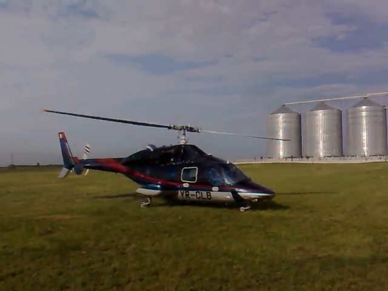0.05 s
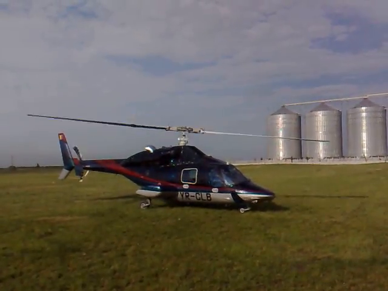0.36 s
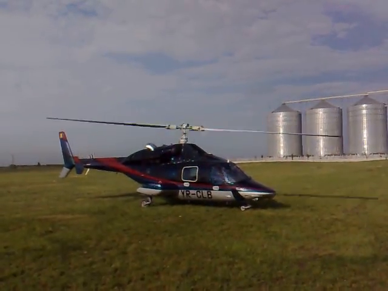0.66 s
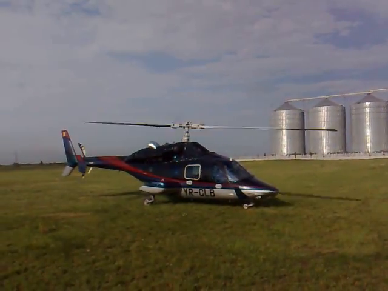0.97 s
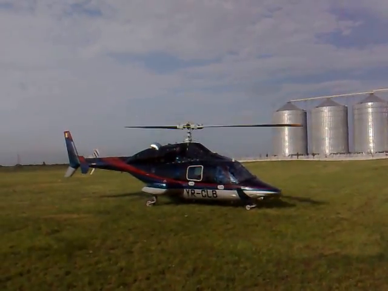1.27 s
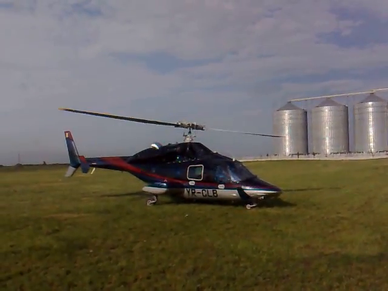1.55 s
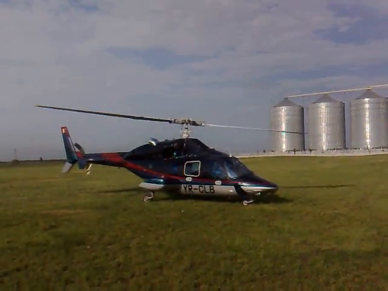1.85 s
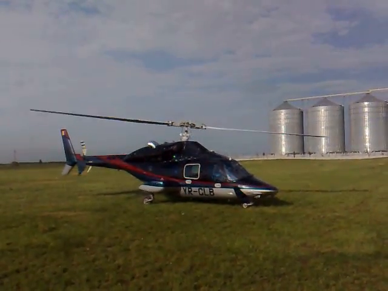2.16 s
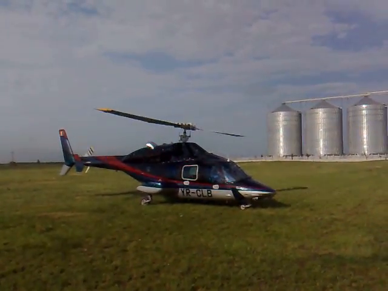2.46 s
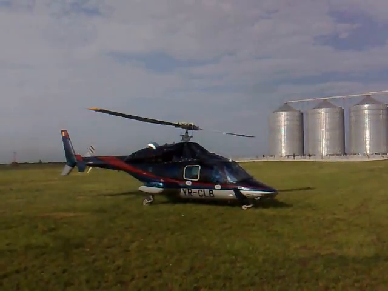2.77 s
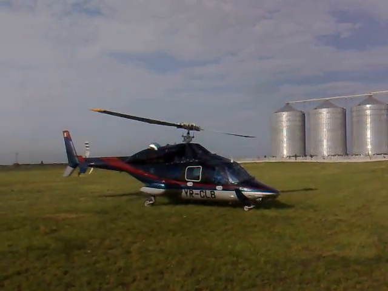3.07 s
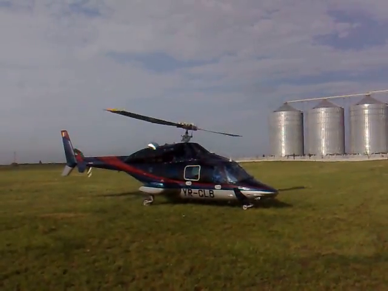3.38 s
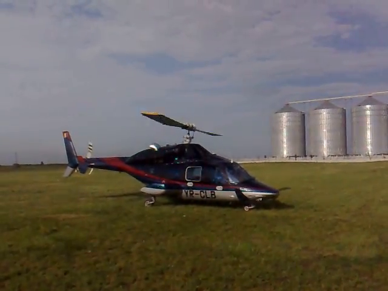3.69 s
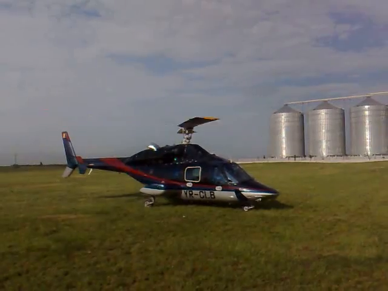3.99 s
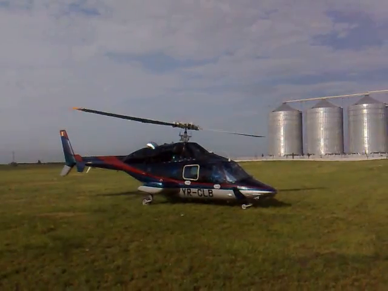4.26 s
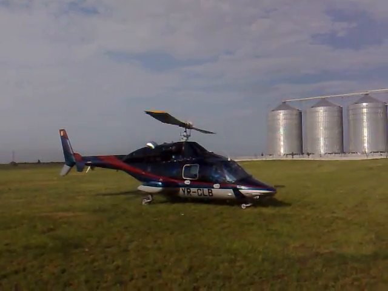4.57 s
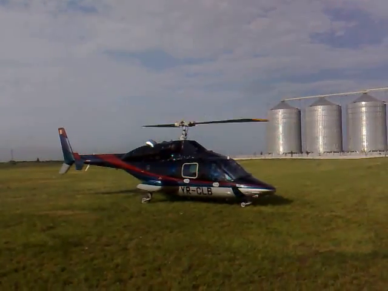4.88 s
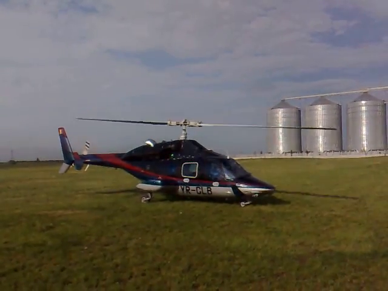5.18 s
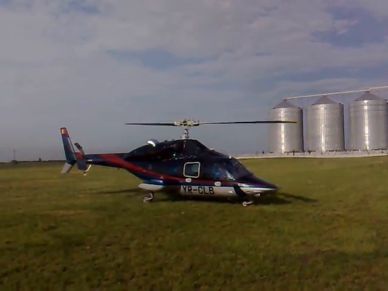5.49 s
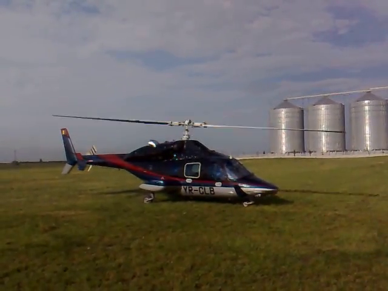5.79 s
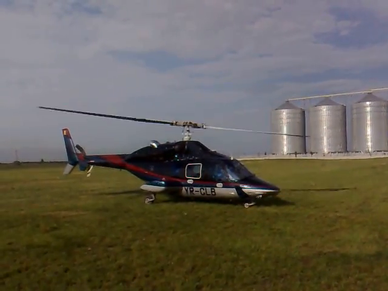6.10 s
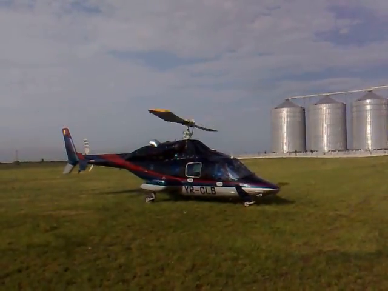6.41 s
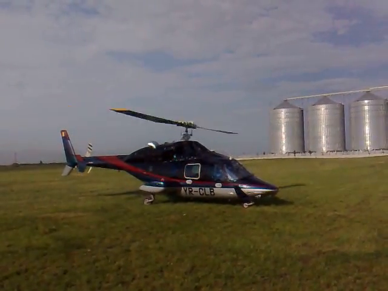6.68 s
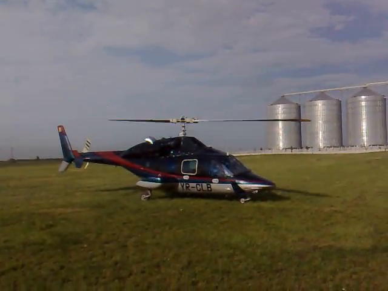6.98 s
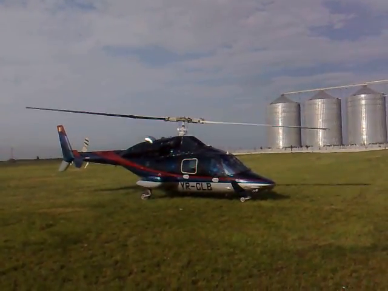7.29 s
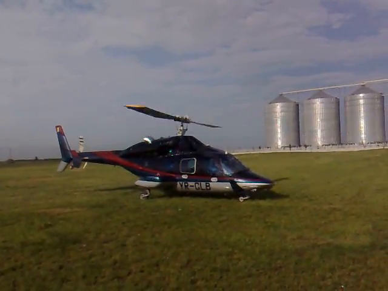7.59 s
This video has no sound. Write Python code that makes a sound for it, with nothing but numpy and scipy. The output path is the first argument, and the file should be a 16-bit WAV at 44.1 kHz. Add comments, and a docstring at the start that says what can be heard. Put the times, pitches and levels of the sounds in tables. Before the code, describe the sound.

A helicopter spools up on an open field, heard loud and continuous from about twenty metres away, straight ahead. For the first 2 seconds the turbine idles with a piercing, very high whine over intake hiss and exhaust rumble, while the blades swish about nine times a second. From 2 seconds the whine climbs, and a breathy whistle swells to a peak around 3.4 seconds before receding. The main rotor slowly quickens to about eleven beats a second, its thump and crackle growing stronger. A low tail rotor hum comes forward around 4 seconds, and faint, thin gear tones sit far behind. Irregular blade slaps poke through, one clearly near 4.9 seconds. Throughout, the whine and hiss flutter in the moving air. After about 7.3 seconds the whine sags slightly, and a blade slaps hard near 7.6 seconds, with the engine still running.

```python
"""A two-bladed turbine helicopter spools up on an open grass field, some twenty metres away.
It opens at idle: the compressor whines near 11 kHz over intake hiss and exhaust rumble, and the blades
swish. From about 2 s the whine climbs, and a breathy duct whistle swells to its peak at 3.4 s.
The main rotor gathers speed and its thump builds, driving the tail rotor's hum and the gearbox with it.
Near the end the whine sags and a blade slaps hard. All along, stirred air flutters and fades the treble."""
import sys
import numpy as np
from scipy import signal
from scipy.fft import rfft, irfft, next_fast_len
from scipy.io import wavfile
from scipy.ndimage import uniform_filter1d, minimum_filter1d

SR = 44100
rng = np.random.default_rng(int(sys.argv[2]) if len(sys.argv) > 2 else 0)


def generate_wav(signal):
    """Clip the signal to [-1, 1] and save it as 16-bit WAV at the path in sys.argv[1]."""
    frames = np.transpose(np.atleast_2d(signal))
    scaled = np.clip(frames, -1, 1) * 32767
    pcm = np.round(scaled).astype(np.int16)
    wavfile.write(sys.argv[1], SR, pcm)


N = 346185
T = np.arange(N) / SR


# the pulse of the scene, main blades passing per second: t/s, f/Hz
BLADE_RATE = [(0, 9.332), (1, 9.414), (2, 9.534), (3, 9.79), (4, 10.104), (5, 10.4), (6, 10.644),
              (7, 10.89), (7.85, 11.09)]
def rotor_drive():
    """The rotor winds up: the running count of blade passes, and its speed from 0 to 1."""
    hz, = curves(BLADE_RATE)
    return turns(hz), zero_to_one(hz)


# colour of the blade-tip crack: f/Hz, relative level/dB
CRACK_EQ = [(200, -26), (480, -16), (650, -7), (900, 9), (1250, -13), (1600, 6), (2000, -11.5), (2600, -6),
            (3500, -8), (6000, -38)]
def blade_thump(blade, speed):
    """Each blade pushes out a pressure dip and crest, and its tip vortex cracks; both build with speed."""
    level_db = -55 + 27.5 * speed ** .48  # most of the swell comes early
    crack_db = .6 * level_db - 7 + 2 * walk(11)
    crack_envelope = bell(offset(blade, .04), .06) * undb(crack_db)
    phase = offset(blade, .09)
    pulse = unit(np.sin(2 * np.pi * 3.7 * phase) * bell(phase, .072))
    thump = pulse * undb(level_db + 1.5 * walk(11))  # no two hits alike
    return thump + turbulence(CRACK_EQ) * crack_envelope


# colour of the air torn by a blade: f/Hz, relative level/dB
SWISH_EQ = [(150, 1.5), (300, -9.5), (410, 1), (480, 4), (570, 2.5), (660, -29), (850, -6.5), (1100, -5),
            (1600, -13), (2100, -21.5), (5000, -32)]
# accents where a blade hits its own wake: t/s, level/dB
WAKE_SLAPS = [(.112, -20), (1.715, -25), (1.92, -27), (2.235, -20), (3.06, -23), (3.16, -22), (3.56, -22),
              (3.66, -27), (4.06, -24), (4.25, -28), (4.85, -17), (5.8, -31), (6.17, -28), (6.27, -26),
              (6.73, -37), (7.645, -14)]
# fader rides for the load on both rotors: t/s, swish level/dB, tail rotor level/dB
ROTOR_LOAD = [(0, -32.5, -35.5), (.8, -35.5, -39), (2, -31.5, -35.5), (3.5, -29, -35.5), (4.0, -30, -28),
              (4.6, -26.5, -33), (5.3, -31, -34.5), (6.3, -26.5, -30), (6.9, -30.5, -30.5), (7.6, -28, -33),
              (7.85, -31, -29)]
def blade_swish(blade):
    """Air noise swells as each tip swings towards the listener, and spikes when a blade slaps its wake."""
    swish_db, _ = curves(ROTOR_LOAD)
    swell = bell(offset(blade, .095), width=.14) * undb(1.5 * walk(14))
    sweep = unit(.25 + swell) * undb(swish_db)  # a bed of air stays between blades
    slaps = sum(undb(db) * bell(T - at, width=.0044) for at, db in WAKE_SLAPS)
    return turbulence(SWISH_EQ) * np.hypot(sweep, slaps)


# harmonic stack of the tail hum: multiple of the tail blade rate, relative level/dB
TAIL_HARMONICS = [(1, -3.5), (2, 1.5), (3, 0.5), (4, -7), (5, -16), (6, -18)]
def tail_rotor(blade):
    """A low hum, geared to the main rotor, whose harmonics waver in the rotor wash."""
    _, tail_db = curves(ROTOR_LOAD)
    cycles = 5.394 * blade + .022 * walk(10)
    hum = sum(undb(db) * tone(k * cycles, fade_db=2, fade_hz=10) for k, db in TAIL_HARMONICS)
    return hum * undb(tail_db)


# pitch glide of the compressor's blade tone: t/s, f/Hz
WHINE_PITCH = [(0.0, 10555), (0.3, 10569), (1.0, 10594), (1.55, 10610), (1.85, 10647), (2.15, 10733),
               (2.45, 10861), (3.05, 11178), (3.35, 11290), (3.65, 11364), (4.0, 11433), (4.6, 11505),
               (5.4, 11576), (6.2, 11622), (6.9, 11649), (7.25, 11677), (7.5, 11629), (7.85, 11489)]
COMPRESSOR_BLADES = 18
def turbine_drive():
    """The turbine spools up: the running cycles of its blade tone, and its speed from 0 (idle) to 1."""
    hz, = curves(WHINE_PITCH)
    return turns(hz), zero_to_one(hz)


# fader ride for the whine as the air carries it: t/s, relative level/dB
WHINE_RIDE = [(0.0, -21), (0.23, -8), (0.65, -17), (0.73, -9), (1.43, -13.5), (1.5, -16.5), (1.68, -12),
              (2.08, -16.5), (2.27, -13.5), (2.75, -18.5), (2.85, -12.5), (2.95, -22), (3.68, -16.5),
              (4.1, -21), (4.28, -7.5), (4.4, -18.5), (5.65, -12.5), (5.93, -20.5), (6.88, -13.5),
              (6.98, -20.0), (7.43, -12.5), (7.62, -26.5), (7.7, -15), (7.85, -26)]
# faint partials under the whine: multiple of the shaft rate, level at idle/dB
SHAFT_PARTIALS = [(6, -46), (9, -45), (12, -46), (17, -38), (19, -41)]
def compressor(spool, speed, flutter):
    """The blades sing one piercing tone; eddies scatter a halo round it, over faint shaft partials."""
    ride_db, = curves(WHINE_RIDE)
    cycles = spool + (.04 + .05 * speed) * walk(45)  # stronger downwash bends the tone's path more
    shimmer = unit(1 + .3 * np.tanh(walk(110)))
    whine = unit(np.sin(2 * np.pi * cycles)) * shimmer
    halo = undb(-12.5 + 5 * speed) * smeared(cycles + 70 * T, width_hz=340)
    shaft = cycles / COMPRESSOR_BLADES
    partials = sum(undb(db) * smeared(k * shaft, width_hz=8 + 2.6 * k) for k, db in SHAFT_PARTIALS)
    # the whine ducks with the treble flutter and flickers on its own, less in the calm air at idle
    stirred = 1 - .28 * (1 - speed)
    duck_db = stirred * (1.5 * dips(flutter) + 6 * dips(walk(34)))
    return (whine + halo) * undb(ride_db + 3.5 + duck_db) + partials * undb(3.2 * speed)


# colours of the duct rush, the intake hiss and the fine sizzle on top: f/Hz, relative level/dB
RUSH_EQ = [(1900, -52), (2200, -27), (2400, -7.5), (2800, -44), (3170, -0.5), (3350, -6), (3820, 6.5),
           (4100, 2), (4350, 3), (4700, -0.5), (5150, 4), (5400, -33), (6200, -32), (8000, -48)]
HISS_EQ = [(3000, -8), (4500, -38), (5200, -19), (5380, -4), (5580, -5), (5800, 0), (6250, 3.5),
           (6500, 3.5), (7200, 4), (7650, 1), (8100, 2), (8500, -4.5), (9200, -7), (12000, -38)]
SIZZLE_EQ = [(8500, -22), (9300, -10), (9900, -1), (10400, 3), (11000, 3), (11800, 0), (12500, -4),
             (13100, -2), (13700, 0), (14300, -1), (15000, -3.5), (15700, -8)]
# fader ride for the duct rush: t/s, relative level/dB
RUSH_RIDE = [(0.0, -21.5), (0.43, -25), (0.62, -20), (0.88, -23.5), (1.45, -22), (1.53, -26), (2.0, -25),
             (2.45, -19.5), (3.0, -26), (3.33, -23), (4.28, -28), (4.9, -23.5), (5.88, -29.5), (6.75, -25),
             (6.83, -30.5), (7.08, -24), (7.48, -33), (7.85, -24)]
# the treble as the air carries it: t/s, relative hiss level/dB, relative sizzle level/dB
TREBLE_RIDE = [(0.0, -21, -26), (0.4, -22.5, -22), (0.5, -21, -26.5), (1.23, -24.0, -28.0),
               (1.33, -21.5, -25.0), (1.48, -27.5, -27.5), (2.08, -21, -25), (2.33, -20, -22),
               (2.43, -17.5, -26), (2.75, -21.0, -23), (3.12, -24.0, -29), (3.33, -20.0, -22),
               (4.0, -24.5, -26.0), (4.8, -21.0, -24.5), (4.93, -16.5, -19.5), (5.08, -22, -24),
               (5.6, -20.5, -24.0), (5.95, -26.5, -27), (6.83, -19.5, -22), (6.98, -23, -25.5),
               (7.23, -20.5, -21.5), (7.58, -28.0, -29.0), (7.7, -19.5, -26), (7.85, -26, -26.0)]
FLUTTER_HZ = 26
def intake(blade, flutter):
    """Air rushes through the ducts and hisses on the compressor; eddies flutter the top band most."""
    rush_db, = curves(RUSH_RIDE)
    hiss_db, sizzle_db = curves(TREBLE_RIDE)
    rush = turbulence(RUSH_EQ) * undb(rush_db + 1 + .82 * walk(FLUTTER_HZ))
    hiss = turbulence(HISS_EQ) * undb(hiss_db + .17 + walk(FLUTTER_HZ))
    chop_db = 1.5 * np.cos(2 * np.pi * blade)  # each passing blade chops the sizzle
    sizzle = turbulence(SIZZLE_EQ) * undb(sizzle_db + 5 - 1.5 * flutter + chop_db)
    return rush + hiss + sizzle


# colours of the exhaust's low end and its midrange body: f/Hz, relative level/dB
RUMBLE_EQ = [(15, -26), (40, -19), (75, -8), (100, -2.5), (150, 3), (190, -1.5), (250, -13), (330, -25.5),
             (600, -22)]
ROAR_EQ = [(200, -3), (330, -3), (480, 1), (660, -1.5), (850, 2), (1050, -2), (1350, 1), (1550, -5.5),
           (1780, -4), (1950, -14), (2200, -14.5), (2600, -13.5), (3500, -6), (6000, -63)]
# fader rides for engine power: t/s, relative rumble level/dB, relative roar level/dB
EXHAUST_RIDE = [(0.0, -23.5, -26.5), (0.4, -29.5, -29), (0.65, -26, -28), (0.9, -35, -32), (1.1, -28, -30),
                (2.15, -25.5, -26.5), (2.9, -23, -27.5), (3.25, -19, -25.5), (4.15, -25, -25.0),
                (4.35, -28, -26), (4.53, -22.5, -23.5), (5.1, -27.0, -26.5), (6.55, -23.5, -24.0),
                (7.85, -23.5, -24)]
def exhaust(blade):
    """Combustion rumbles and the jet roars; both throb as blades cut through the exhaust."""
    rumble_db, roar_db = curves(EXHAUST_RIDE)
    throb = np.cos(2 * np.pi * offset(blade, .9))
    rumble = turbulence(RUMBLE_EQ) * undb(rumble_db - 3 + throb)
    roar = turbulence(ROAR_EQ) * undb(roar_db + 1 + .57 * throb + .49 * walk(25))
    return rumble + roar


# fader ride for the rising whistle: t/s, level/dB
WHISTLE_RIDE = [(0, -42), (2.6, -34), (3.1, -28.5), (3.4, -23.3), (3.9, -26), (4.3, -32.5), (4.95, -30),
                (5.6, -35), (6.0, -35), (6.35, -34), (6.8, -35), (7.5, -43), (7.85, -35)]
def duct_whistles(spool):
    """A breathy whistle rises with the shaft; two fixed duct resonances sing at idle, then fall back."""
    rising_db, = curves(WHISTLE_RIDE)
    rising = smeared(.4394 * spool, width_hz=125) + undb(-11) * smeared(.378 * spool, width_hz=70)
    rising = unit(rising * undb(2.2 * walk(30)))
    idle = smeared(6180 * T, width_hz=90) + undb(-9) * smeared(5170 * T, width_hz=90)
    idle_db = np.interp(T, [0, 2.5, 3.2], [-31, -31, -50])
    return rising * undb(rising_db) + idle * undb(idle_db)


# fader rides for the gears: t/s, main transmission level/dB, turbine gear level/dB
GEAR_RIDE = [(0, -54, -50), (2, -50, -44), (4.2, -47, -41), (4.7, -37.5, -39), (5.4, -40.5, -40),
             (6.3, -46, -35), (7.2, -50, -34), (7.85, -48, -37)]
def gearbox(blade, spool):
    """Two thin mesh tones far back in the mix: one tracks the rotor, one twice the turbine shaft rate."""
    main_db, turbine_db = curves(GEAR_RIDE)
    shaft = spool / COMPRESSOR_BLADES
    main = tone(160.86 * blade + .15 * walk(25), fade_db=2.5, fade_hz=30)
    turbine = tone(2 * shaft + .1 * walk(30), fade_db=3, fade_hz=30)
    return main * undb(main_db) + turbine * undb(turbine_db)


def undb(db):
    """Decibels to gain."""
    return 10 ** (np.asarray(db) / 20)


def unit(x):
    """Scale to rms 1."""
    return x / np.sqrt(np.mean(x ** 2))


def zero_to_one(x):
    """Scale to run from 0 at the lowest to 1 at the highest."""
    return (x - x.min()) / np.ptp(x)


def curves(table):
    """One automation lane per value column, with straight ramps between the points."""
    times, *columns = np.transpose(table)
    return [np.interp(T, times, column) for column in columns]


def turns(hz):
    """Cycles completed at a changing rate."""
    return np.cumsum(hz) / SR


def offset(blade, moment):
    """Signed distance, in blade periods, from a given moment of the nearest pass."""
    return (blade - moment + .5) % 1 - .5


def bell(x, width):
    """A Gaussian swell that peaks at x = 0."""
    return np.exp(-.5 * (x / width) ** 2)


def walk(hz):
    """A smooth random modulator: levels held for 1 / hz seconds and slewed twice; spread near 1."""
    hold = int(SR / hz)
    steps = np.repeat(rng.standard_normal(N // hold + 1), hold)
    return 1.54 * uniform_filter1d(uniform_filter1d(steps, hold), hold)[:N]


def dips(wander):
    """Turn a modulator into dips below a steady ceiling."""
    return -np.logaddexp(0, 2 * wander) / 2


def turbulence(eq):
    """Noise of rms 1 shaped by an EQ curve, falling 20 dB per octave beyond its ends."""
    hz, db = np.transpose(eq)
    size = next_fast_len(N)
    f = np.maximum(np.arange(size // 2 + 1) * SR / size, 1)
    octaves_outside = np.abs(np.log2(f / np.clip(f, hz[0], hz[-1])))
    gain = undb(np.interp(np.log(f), np.log(hz), db) - 20 * octaves_outside)
    return unit(irfft(rfft(rng.standard_normal(size)) * gain, size)[:N])


def smeared(cycles, width_hz):
    """A tone of rms 1 blurred into a narrow noise band that follows its pitch."""
    lowpass = signal.butter(2, width_hz / 2, fs=SR, output="sos")
    blur = signal.sosfilt(lowpass, rng.standard_normal((2, N)))
    return unit(blur[0] * np.cos(2 * np.pi * cycles) + blur[1] * np.sin(2 * np.pi * cycles))


def tone(cycles, fade_db, fade_hz):
    """A sine of rms 1 that fades in and out in moving air."""
    return unit(np.sin(2 * np.pi * cycles) * undb(fade_db * walk(fade_hz)))


def scene():
    """Rotors and engine, panned dead centre as one point across the field."""
    blade, rotor_speed = rotor_drive()
    spool, turbine_speed = turbine_drive()
    flutter = walk(FLUTTER_HZ)  # the same eddies stir the whine and the sizzle around it
    rotors = blade_swish(blade) + blade_thump(blade, rotor_speed) + tail_rotor(blade)
    gears = gearbox(blade, spool)
    engine = exhaust(blade) + compressor(spool, turbine_speed, flutter)
    airflow = intake(blade, flutter) + duct_whistles(spool)
    return np.tile(rotors + gears + engine + airflow, (2, 1))


def record(dry):
    """A fast limiter tames the loudest peaks, then a steep high cut at 15.6 kHz takes off the top."""
    headroom = np.minimum(1, .87 / (np.abs(dry[0]) + 1e-9))
    gain = uniform_filter1d(minimum_filter1d(headroom, size=200), size=200)
    high_cut = signal.ellip(10, .2, 80, 15600, fs=SR, output="sos")
    return signal.sosfilt(high_cut, dry * gain)


dry = scene()
out = record(dry)
generate_wav(out)
```